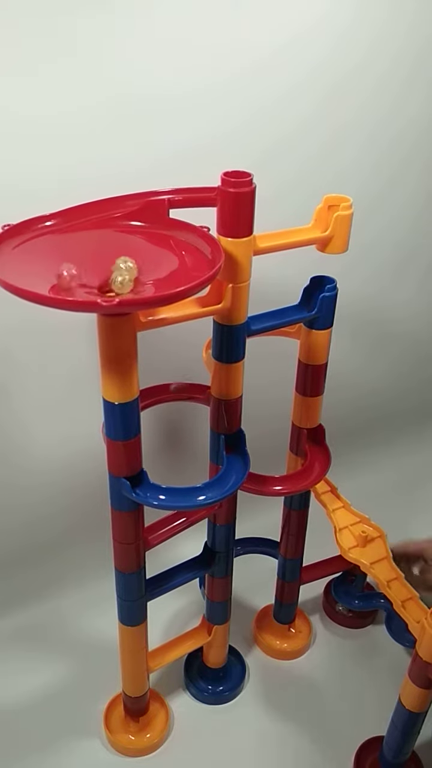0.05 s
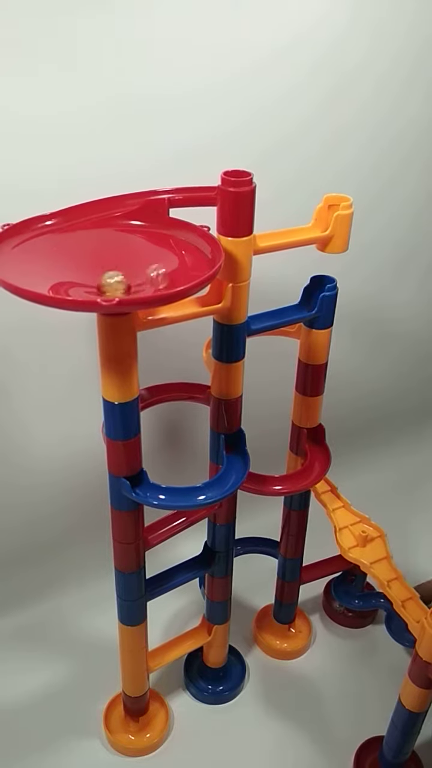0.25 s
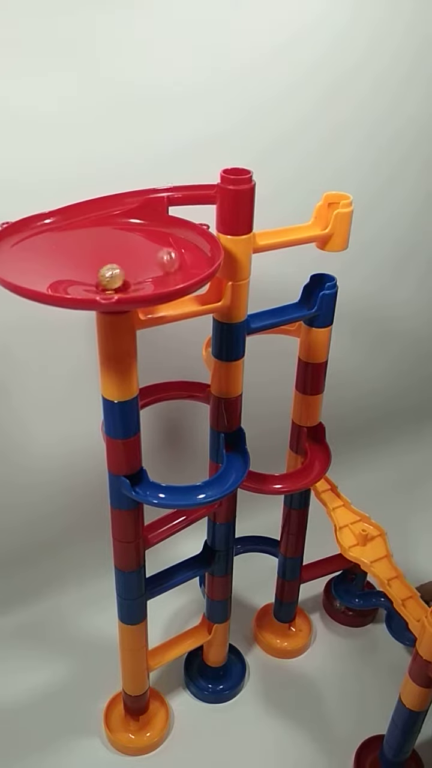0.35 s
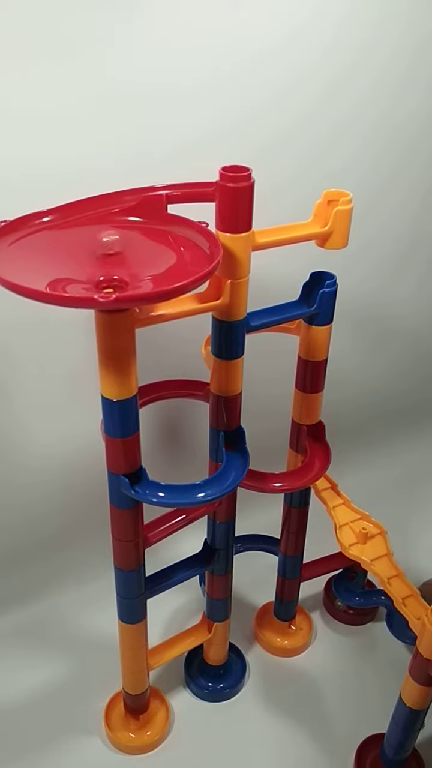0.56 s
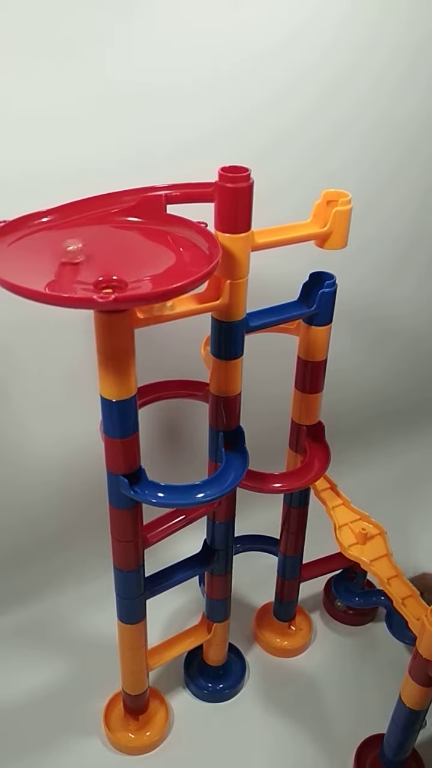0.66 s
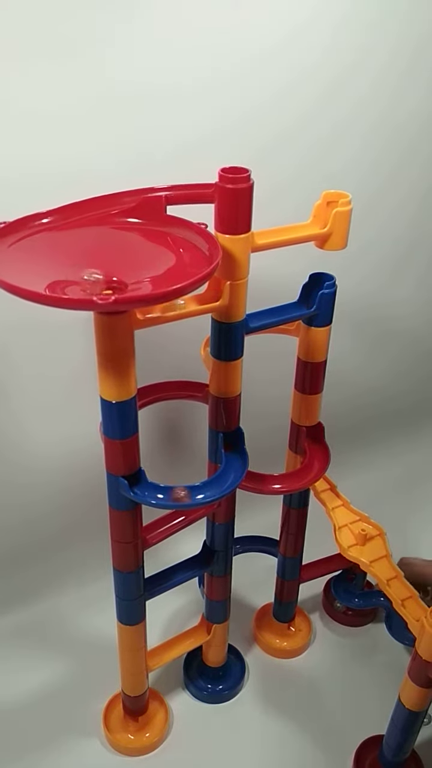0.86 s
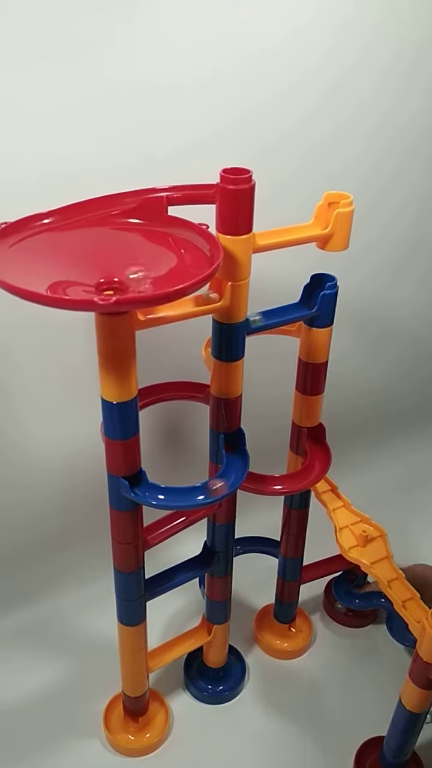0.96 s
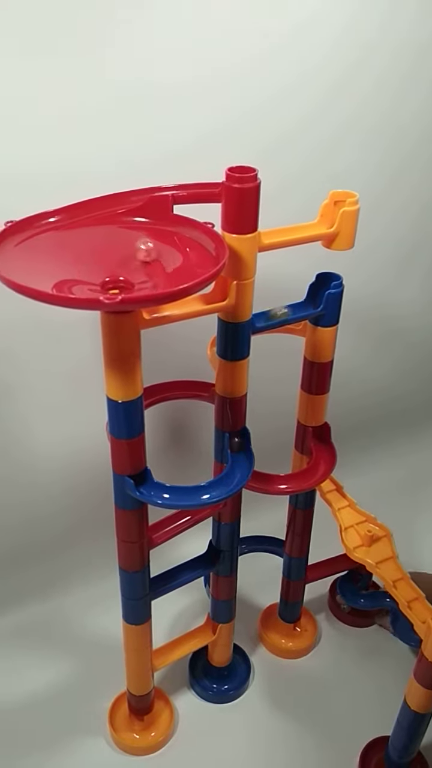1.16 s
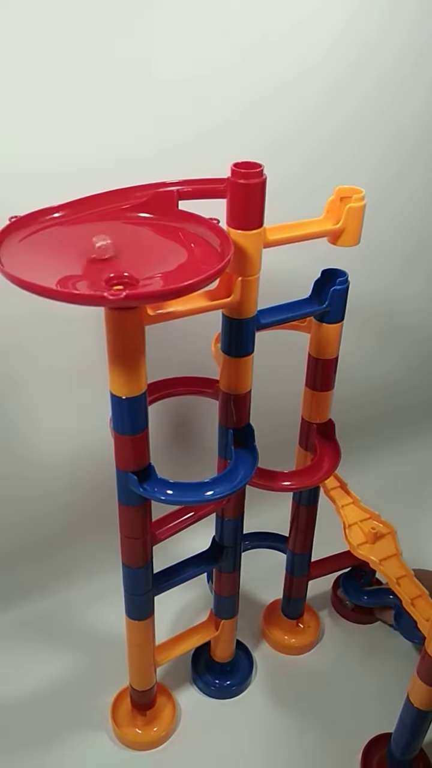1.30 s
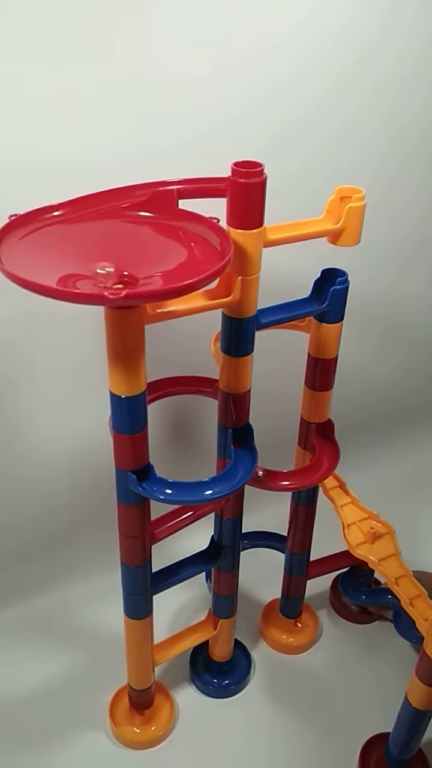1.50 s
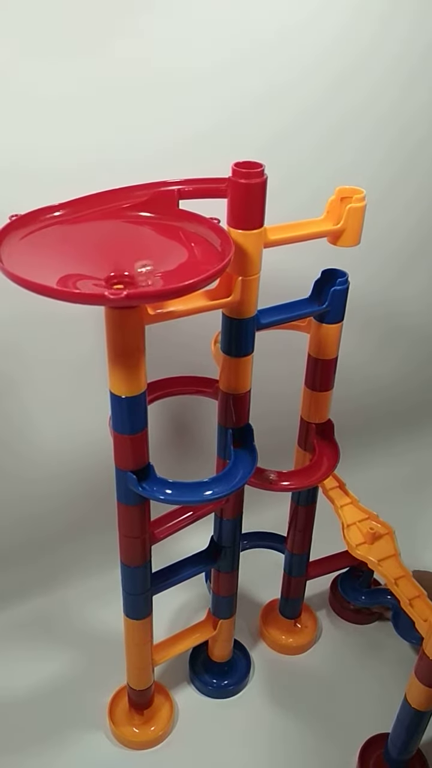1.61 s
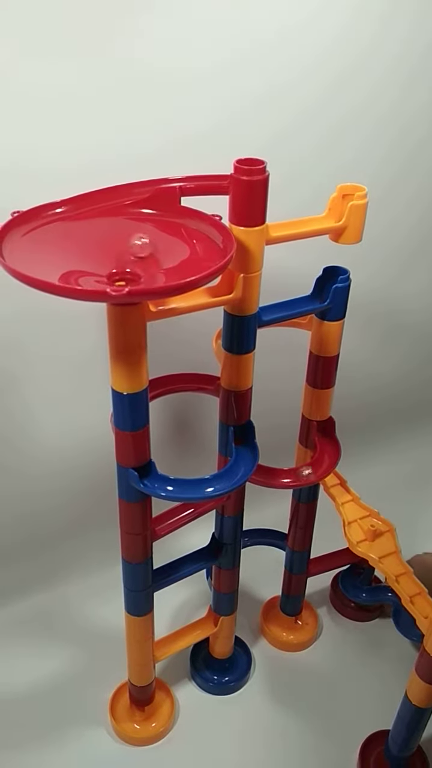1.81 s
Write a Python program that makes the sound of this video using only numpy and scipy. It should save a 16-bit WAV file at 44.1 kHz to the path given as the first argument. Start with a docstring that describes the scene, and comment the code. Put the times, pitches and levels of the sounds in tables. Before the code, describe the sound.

Marbles roll and knock down a plastic track tower in a small, bare room. A soft circling whir comes first, then a rapid tumble of sharp ticks and hollow knocks, which thins out and leaves the whir.

```python
"""A glass marble whirs round the funnel bowl of a plastic track tower, then hard knocks tumble in.
Other marbles drop through the tubes, strike the chutes and rattle along them in a small, bare room.
Each knock is a bright tick, a short ring of the thin plastic and a thud of the whole tower.
Rolling is a stream of tiny bumps that keeps the plastic humming; the funnel marble circles throughout."""
import sys
import numpy as np
from scipy import signal
from scipy.fft import rfft, irfft
from scipy.io import wavfile
from scipy.ndimage import uniform_filter1d

SR = 44100
rng = np.random.default_rng(int(sys.argv[2]) if len(sys.argv) > 2 else 0)


def persist_wave(psi):
    """Save psi, clipped to +-1, as 16-bit WAV."""
    counts = np.round(np.clip(psi, -1, 1) * 32767).astype(np.int16)
    wavfile.write(sys.argv[1], SR, np.atleast_2d(counts).T)


N = 81585
FFT_SIZE = 2 ** 17
TIME = np.arange(N) / SR
TAIL = TIME[:SR // 2]
BIN_HZ = np.maximum(np.arange(FFT_SIZE // 2 + 1) * SR / FFT_SIZE, 1)

# Marble hits, before the layer trims: t/s, tick/dB, shell/dB, tube/dB, thud/dB,
# shell lean to the left/dB, favoured shell f/Hz, snap over tick/dB
KNOCKS = [(0.1172, -35, -45, -72, -83, -1, 1600, -4), (0.2225, -22, -27.5, -40.5, -73, 7, 1630, -8),
          (0.2302, -23, -31, -71, -51, 1, 1640, -4), (0.2519, -26.5, -50, -37, -56, -1, 1600, 2),
          (0.2718, -18.5, -17, -23.5, -23, 13, 1937, -4), (0.3486, -17, -28, -29, -32, 26, 1860, -10),
          (0.362, -28, -33, -59, -31.5, -9, 2090, -11), (0.3856, -50, -25.5, -32, -42, 14, 1955, -6),
          (0.4492, -38, -33, -33.5, -60, 13, 1550, -1), (0.5114, -47, -29, -35, -43, 9.5, 1650, -11),
          (0.5903, -28, -49, -37, -48, -1, 1770, -4), (0.599, -22.5, -25, -34.5, -58, 14.5, 1720, -3),
          (0.628, -21, -25, -43, -46, 9.5, 1660, -7.5), (0.6501, -22.5, -25.5, -38, -56, 3, 1630, -16),
          (0.6589, -30.5, -25.5, -30, -30.5, 19.5, 2120, 4), (0.7188, -28, -21, -31.5, -35, 7, 2190, -27),
          (0.8174, -22, -14.5, -22, -21.5, 8, 1683, -0.5),
          (0.896, -22, -21.5, -30.5, -36.5, 8.5, 1850, -1.5),
          (0.9798, -18.5, -24.5, -42, -65, 3, 1780, -4.5), (0.9848, -25, -23, -75, -40, 12, 1900, -14),
          (1.0126, -18, -22, -30.5, -29, 19.5, 1950, -13.5), (1.0613, -42, -27.5, -55, -33.5, 4, 1845, 5.5),
          (1.1364, -17.5, -23.5, -31, -67.5, 7, 1890, -6.5), (1.1705, -21, -19, -27.5, -30, 12, 1924, -26),
          (1.2197, -18.5, -18, -30, -67.5, 8, 1460, 0.5), (1.2768, -20, -35, -28.5, -38, -3, 1890, -16),
          (1.284, -27, -29.5, -30.5, -48, 19, 1850, 1), (1.291, -23.5, -21, -28.5, -28, 12.5, 1840, -16),
          (1.3223, -23, -23, -32, -27.5, -1, 1570, -13), (1.3419, -22.5, -23.5, -29.5, -28, 18, 1960, 0),
          (1.3659, -18.5, -20.5, -26, -33, 10.5, 1930, -1), (1.3892, -31, -20.5, -42, -55, 1, 1700, -1),
          (1.42, -18.5, -25.5, -21.5, -56, 8, 1652, -13), (1.4329, -40, -19.5, -36, -35, 6, 1440, 3),
          (1.4806, -18.5, -22, -28, -34.5, 11, 1933, -25), (1.526, -25, -26.5, -30.5, -64, 7, 1524, -8),
          (1.7256, -73, -57, -51, -79, -24, 1590, -15), (1.7817, -77, -42, -79, -63, 12, 1610, -2)]
# Bumps of a marble falling through a column: t/s, level/dB
CLUNKS = [(.511, -35.5), (.552, -39), (.598, -39.5), (.765, -40.5), (1.013, -39), (1.42, -34.5)]
# Marble circling the funnel: t/s, whir/dB, bowl ring/dB
FUNNEL_ROLL = [(0, -40, -48), (.2, -37, -46), (.6, -38, -45), (.8, -43.5, -39.5), (1.1, -41.5, -46),
               (1.55, -46, -52), (1.66, -39.5, -41.5), (1.75, -48, -46), (1.85, -45, -47)]
# Marbles rolling in the chutes: t/s, rumble/dB, rattle/dB
CHUTE_ROLL = [(0, -99, -58), (.2, -74, -50.5), (.28, -44, -44), (.42, -40.5, -45), (.49, -48.5, -48),
              (.55, -42.5, -35.5), (.61, -49.5, -39), (.75, -41, -55), (.8, -48, -52), (.86, -47, -37.5),
              (.96, -54.5, -74), (1.04, -40.5, -32.5), (1.12, -48.5, -54), (1.25, -47, -32),
              (1.36, -44, -29), (1.46, -44, -40), (1.56, -65, -63), (1.63, -64.5, -62), (1.85, -86, -84)]
# Chute walls ringing under a marble, and the tower shaking as it takes the lower bends: t/s, level/dB
WALL_RING = [(.2, -81), (.3, -59), (.5, -53), (.8, -55), (.9, -49), (1, -57), (1.1, -49), (1.22, -37.5),
             (1.3, -34.5), (1.38, -35), (1.48, -39.5), (1.56, -45.5), (1.66, -53)]
TOWER_SHAKE = [(1.2, -47), (1.29, -41), (1.36, -35), (1.41, -37.5), (1.455, -34.5), (1.5, -44), (1.57, -47),
               (1.63, -65)]

# Tone colours of the knock layers, the rolling and the room: f/Hz, relative level/dB
SNAP_EQ = [(2000, -21), (4000, -13), (7000, 15), (9300, -3), (11200, 23), (15500, 6.5)]
TICK_EQ = [(1500, -11.5), (2800, 4.5), (3400, -4.5), (4200, 2), (5000, 2), (5800, -3.5), (8500, -2.5),
           (9300, -5.5), (10200, 1), (11400, -2.5), (13500, -7.5), (15500, -22)]
SHELL_EQ = [(900, -29), (1300, -14.5), (1550, 2.5), (1750, -2.5), (2050, 2.5), (2350, -13), (3000, -8),
            (5000, -27.5), (9000, -42)]
TUBE_EQ = [(250, -13), (440, -23), (660, -1), (870, -5), (1040, 2), (1300, 1), (1700, -10), (3000, -30)]
THUD_EQ = [(25, -44), (50, -31), (75, -15), (90, -17), (120, -5), (160, -2), (183, 2), (235, -17),
           (310, -12), (440, -32), (900, -45)]
WHIR_EQ = [(40, -50), (90, -42), (180, -29), (240, -39), (480, -43), (610, -22), (760, -21), (900, -30),
           (1050, -22), (1170, -13), (1400, -11), (1540, 0), (1750, -3), (2020, -5), (2300, -23),
           (2850, -20), (3700, -25), (4600, -21), (5500, -31), (11000, -33), (16000, -48)]
RATTLE_EQ = [(200, -17), (320, -12), (440, -21), (680, -1), (870, -4), (1050, 1), (1300, 0), (1800, 3),
             (2500, -4), (4800, -6), (9000, -13), (11200, -6), (15500, -15)]
ROOM_EQ = [(25, -1), (80, 5), (200, 2), (1000, -29), (16000, -44)]

# Resonances of the plastic parts and of the whole tower: f/Hz, relative level/dB, t60/s
SHELL_MODES = [(1049, -5, .22), (1169, -9, .2), (1315, -11, .15), (1489, -4, .18), (1572, -3, .15),
               (1648, -1, .17), (1713, 0, .2), (1786, 0, .2), (1868, -1, .18), (1900, -3, .15),
               (2003, -2, .15), (2090, -5, .15), (2853, -13, .18)]
TOWER_MODES = [(77.3, -21, 0.24), (110.6, -11.5, 0.18), (162, -8, 0.11), (181.2, -1, 0.16),
               (316, -2, 0.069)]
COLUMN_MODES = [(177.6, -2.5, 0.16), (322, -5.5, 0.098), (383, -6, 0.25), (643, 1, .2), (769, 1.5, 0.099)]
BOWL_MODES = [(597, -18, .25), (1183, -11, .25), (1240, -11, .25), (1477, -4, .25), (1555, -2, .25),
              (1587, 0, .3), (1663, -1, .25)]
WALL_MODES = [(785, -10, .2), (945, -6, .2), (1049, 0, .4), (1169, -4, .25), (1489, -5, .25)]
SHAKE_MODES = [(76, -5, .3), (116, -7, .2), (150, -3, .2), (166, 0, .2), (184, 0, .25)]

# Stereo image: f/Hz, left-right correlation, left minus right/dB
IMAGE = [(30, 0.93, 5), (100, 1, 0.5), (186, 0.99, -1.5), (280, 0.8, 1.5), (660, 0.76, -3.5),
         (1060, 0.06, 3), (1690, 0.032, 10.5), (2310, 0.27, 0.5), (3650, 0.0084, 2.5), (10000, 0.011, -0.5)]

SHELL_RISE_S, THUD_RISE_S, SETTLE_S = .0025, .004, .005
FAVOUR_DB, FAVOUR_WIDTH_HZ = 14, 112  # the struck part lifts the modes near its own pitch
EQ_RIPPLE_DB, KNOCK_RIPPLE_DB, RIPPLE_STEP_HZ, RIPPLE_FROM_HZ = 2.5, 6.5, 140, 2500
BUMPS_PER_S, BUMP_SPREAD_DB, SWELL_CYCLES, STEADY_S = 700, 4.5, 2, .03
ROOM_T60_S, ROOM_TONE_DB = .3, -82
LOW_CUT_HZ, HIGH_CUT_HZ = 32, 16000


def knocks():
    """Glass hits plastic: snap and tick on top, shell ring and hollow tube as body, tower thud below."""
    times, tick, shell, tube, thud, lean, pitches, snap = np.transpose(KNOCKS)
    shell = np.array([db + split(left) for db, left in zip(shell, lean - lean.mean())])
    return (dense_ring(times, tick + snap + 4.5, SNAP_EQ, rise_s=.0005, t60=.017, room_db=-19)
            + dense_ring(times, tick - 3.5, TICK_EQ, rise_s=.0006, t60=.022, room_db=-9)
            + dense_ring(times, shell - .5, SHELL_EQ, SHELL_RISE_S, t60=.041, room_db=-8.5)
            + dense_ring(times, tube + 2.5, TUBE_EQ, SHELL_RISE_S, t60=.052, room_db=-8.5)
            + dense_ring(times, thud - 2.5, THUD_EQ, THUD_RISE_S, t60=.046, room_db=-11)
            + clear_ring(times, shell - 15.5, pitches, SHELL_MODES, SHELL_RISE_S, spread_db=-.5)
            + clear_ring(times, thud - 3, pitches, TOWER_MODES, THUD_RISE_S, spread_db=3))


def dense_ring(times, levels_db, eq, rise_s, t60, room_db):
    """Each knock excites countless overlapping modes: a burst of coloured noise."""
    out = np.zeros((2, N))
    envelope = decay(t60, room_db) * attack(rise_s)
    for t, db in zip(times, levels_db):
        add(out, t, from_db(db) * envelope * contact_noise())
    return colour(out, eq)


def clear_ring(times, levels_db, pitches, modes, rise_s, spread_db):
    """The strongest modes sing out, in a new balance at every point of contact."""
    out = np.zeros((2, N))
    for hz, mode_db, t60 in modes:
        tone = mode_tone(hz, mode_db, t60) * attack(rise_s)
        for t, db, pitch in zip(times, levels_db, pitches):
            favour_db = FAVOUR_DB * np.exp(-((hz - pitch) / FAVOUR_WIDTH_HZ) ** 2)
            strength = from_db(db + favour_db + spread_db * rng.standard_normal())
            add(out, t, tone * strength * rng.choice([-1, 1]))
    return out


def contact_noise():
    """A contact starts white and settles into the treble resonances of the struck spot."""
    hz = np.arange(len(TAIL) // 2 + 1) * SR / len(TAIL)
    gain = from_db(KNOCK_RIPPLE_DB * ripple(hz))
    gain = np.where(hz > RIPPLE_FROM_HZ, unit_power(gain), 1)
    white = rng.standard_normal((2, len(TAIL)))
    settled = irfft(rfft(white) * gain, len(TAIL))
    onset = np.exp(-(TAIL / SETTLE_S) ** 2)
    return onset * white + (1 - onset) * settled


def clunks():
    """A falling marble bumps the inside of a column, which answers low and hollow."""
    out = np.zeros((2, N))
    for t, db in CLUNKS:
        column = sum(mode_tone(*mode) for mode in COLUMN_MODES)
        add(out, t, from_db(db) * column * attack(SHELL_RISE_S))
    return out


def chutes():
    """Marbles running along the chutes rumble, rattle, ring the walls and shake the tower."""
    rumble_db, rattle_db = automation(CHUTE_ROLL)
    shake_start_s = TOWER_SHAKE[0][0]
    shake = ringing(automation(TOWER_SHAKE)[0], SHAKE_MODES) * (TIME > shake_start_s)
    roll = rolling(rumble_db, THUD_EQ) + rolling(rattle_db, RATTLE_EQ)
    walls = ringing(automation(WALL_RING)[0], WALL_MODES)
    return roll + walls + shake


def funnel():
    """The circling marble whirs and keeps the bowl humming."""
    whir_db, ring_db = automation(FUNNEL_ROLL)
    return rolling(whir_db, WHIR_EQ) + ringing(ring_db, BOWL_MODES)


def rolling(level_db, eq):
    """The grain of a roll: each bump sends a puff of noise through the plastic and the room."""
    response = rng.standard_normal((2, len(TAIL))) * decay(t60=.03, room_db=-9)
    return steady(colour(bumps_into(response), eq)) * from_db(level_db)


def ringing(level_db, modes):
    """The hum of a roll: the bumps keep the modes of a part sounding."""
    response = sum(mode_tone(hz, db, t60) * attack(SWELL_CYCLES / hz) for hz, db, t60 in modes)
    return steady(bumps_into(response)) * from_db(level_db)


def bumps_into(response):
    """A rolling marble meets tiny bumps at random; each sets off the response."""
    hits = rng.random(N) < BUMPS_PER_S / SR
    strength = from_db(BUMP_SPREAD_DB * np.minimum(rng.exponential(1, N), 4))
    bumps = hits * strength * rng.choice([-1, 1], N)
    return irfft(rfft(bumps) * rfft(response, N), N)


def room_tone():
    """A faint, dark bed of noise."""
    return from_db(ROOM_TONE_DB) * colour(rng.standard_normal((2, N)), ROOM_EQ)


def mode_tone(hz, mode_db, t60):
    """One decaying mode, reaching left and right with its own gain and phase."""
    phase = split(np.arccos(correlation(hz))) * rng.choice([-1, 1])
    return pan(hz) * np.sin(2 * np.pi * hz * TAIL + phase) * from_db(mode_db - 60 * TAIL / t60)


def colour(x, eq):
    """Unit-power EQ with rippled treble; spreads two channels, as mid and side, into the stereo image."""
    gain = from_db(at_hz(eq, BIN_HZ) + EQ_RIPPLE_DB * ripple(BIN_HZ))
    cepstrum = irfft(np.log(unit_power(gain)))
    cepstrum[1:FFT_SIZE // 2] *= 2  # minimum phase: nothing rings ahead of a hit
    cepstrum[FFT_SIZE // 2 + 1:] = 0
    mid, side = rfft(x, FFT_SIZE)
    alike = correlation(BIN_HZ)
    pair = np.sqrt((1 + alike) / 2) * mid + np.sqrt((1 - alike) / 2) * side * [[1], [-1]]
    return irfft(pair * pan(BIN_HZ) * np.exp(rfft(cepstrum)))[:, :N]


def ripple(hz):
    """Narrow treble resonances of the plastic, as random peaks and dips."""
    steps = np.arange(0, SR / 2, RIPPLE_STEP_HZ)
    peaks = np.diff(rng.standard_normal(len(steps) + 1)) / np.sqrt(2)
    return np.interp(hz, steps, peaks * (steps > RIPPLE_FROM_HZ))


def attack(rise_s):
    """A resonance builds up with this time constant."""
    return 1 - np.exp(-TAIL / rise_s)


def decay(t60, room_db):
    """The part's own fast decay, then the room's slow tail."""
    return np.hypot(from_db(-60 * TAIL / t60), from_db(room_db - 60 * TAIL / ROOM_T60_S))


def steady(x):
    """Leveller for an even roll: holds the short-term power at one."""
    power = uniform_filter1d(np.mean(x ** 2, axis=0), int(STEADY_S * SR))
    return x / np.sqrt(power + 1e-12)


def pan(hz):
    """Left and right gains by frequency; the funnel stands to the left."""
    return unit_power(from_db(split(at_hz(IMAGE, hz, column=2))))


def correlation(hz):
    """How alike left and right are at a frequency."""
    return np.clip(at_hz(IMAGE, hz), -1, 1)


def split(difference):
    """Half up on the left, half down on the right."""
    return np.array([[.5], [-.5]]) * difference


def unit_power(gain):
    """Scale gains to a mean square of one."""
    return gain / np.sqrt(np.mean(gain ** 2, axis=0))


def from_db(db):
    """Decibels to gain."""
    return 10 ** (np.asarray(db) / 20)


def at_hz(table, hz, column=1):
    """Read a table on a log-frequency axis."""
    table = np.array(table)
    return np.interp(np.log(hz), np.log(table[:, 0]), table[:, column])


def automation(table):
    """A table's level curves at every sample."""
    times, *curves = np.transpose(table)
    return [np.interp(TIME, times, curve) for curve in curves]


def add(out, t, sound):
    """Mix a sound in at t seconds."""
    start = int(t * SR)
    out[:, start:start + sound.shape[1]] += sound[:, :N - start]


def scene():
    """Knocks and clunks over the rolling in funnel and chutes, in a quiet room."""
    return knocks() + clunks() + funnel() + chutes() + room_tone()


def record(dry):
    """The small microphone loses the deep bass; the top is cut steeply."""
    thin = signal.sosfilt(signal.butter(2, LOW_CUT_HZ, "high", fs=SR, output="sos"), dry)
    return signal.sosfilt(signal.ellip(10, .2, 80, HIGH_CUT_HZ, fs=SR, output="sos"), thin)


dry = scene()
out = record(dry)
persist_wave(out)
```